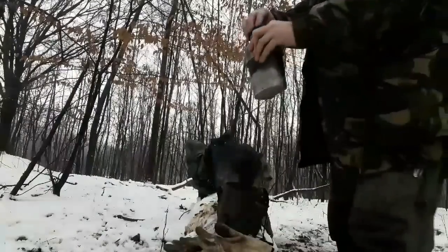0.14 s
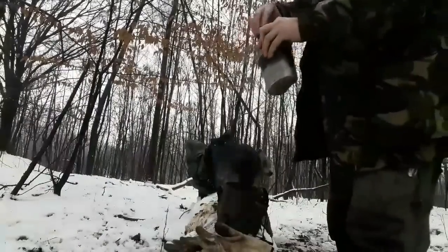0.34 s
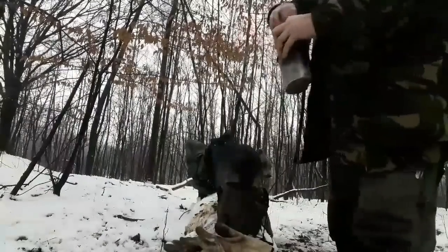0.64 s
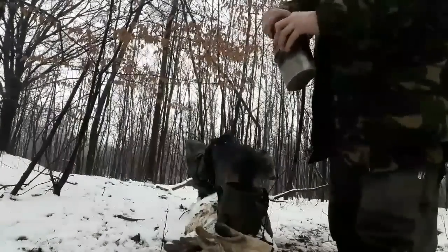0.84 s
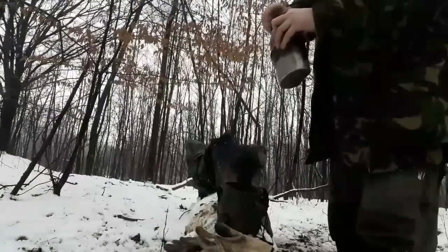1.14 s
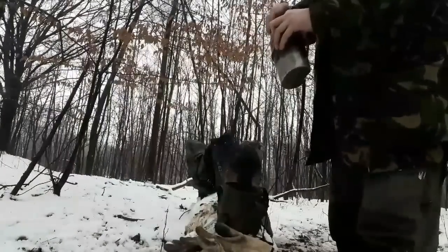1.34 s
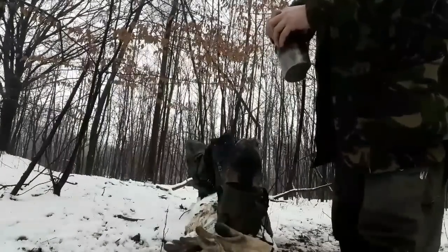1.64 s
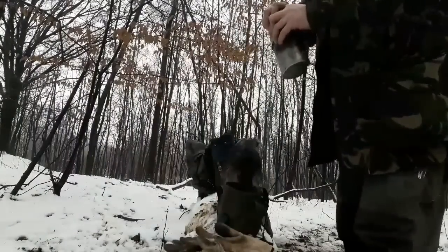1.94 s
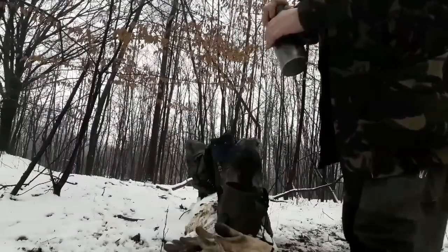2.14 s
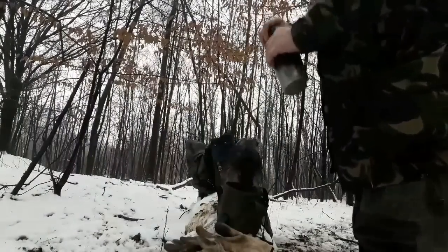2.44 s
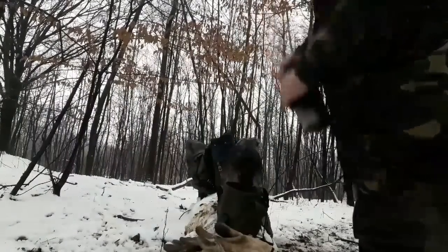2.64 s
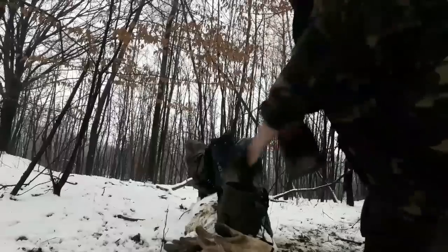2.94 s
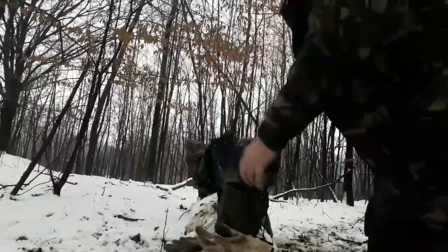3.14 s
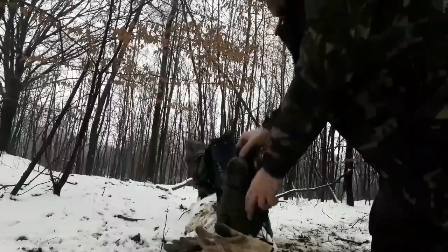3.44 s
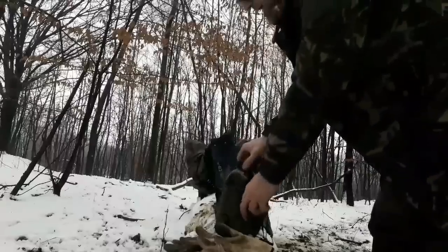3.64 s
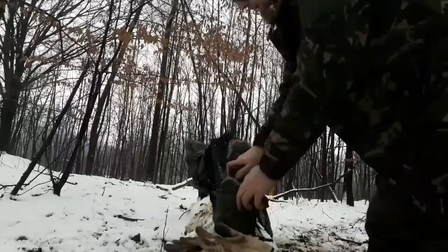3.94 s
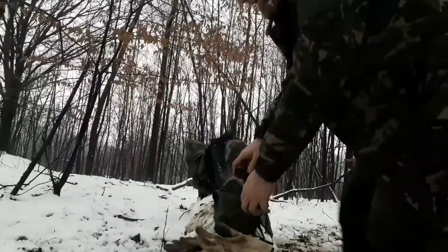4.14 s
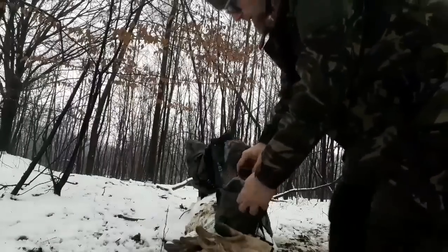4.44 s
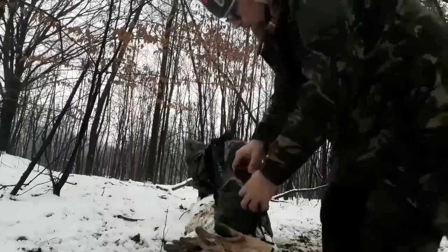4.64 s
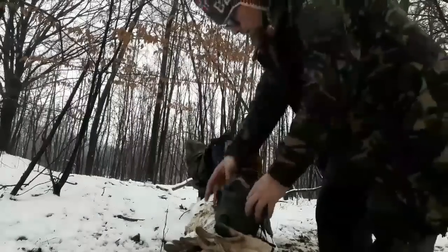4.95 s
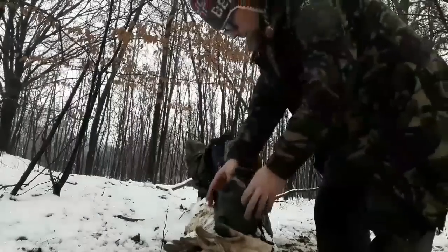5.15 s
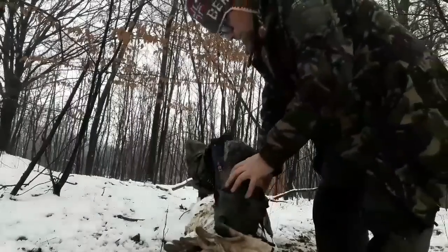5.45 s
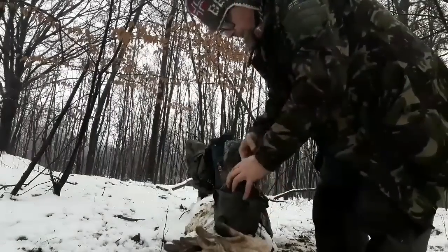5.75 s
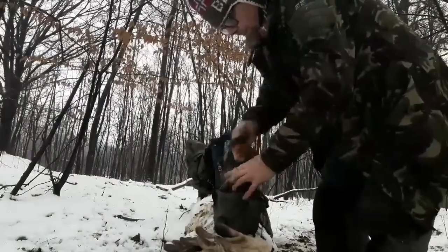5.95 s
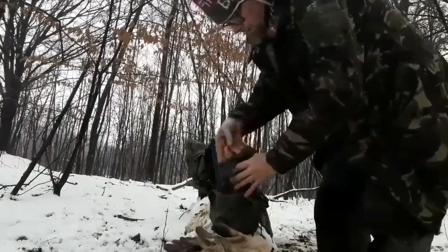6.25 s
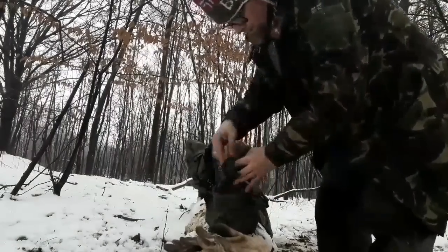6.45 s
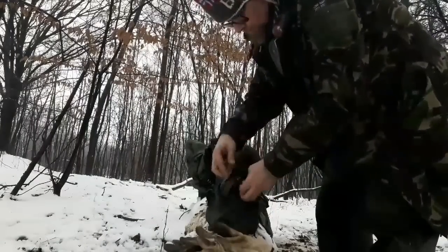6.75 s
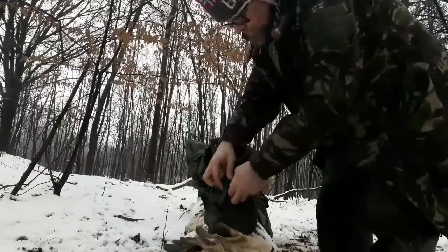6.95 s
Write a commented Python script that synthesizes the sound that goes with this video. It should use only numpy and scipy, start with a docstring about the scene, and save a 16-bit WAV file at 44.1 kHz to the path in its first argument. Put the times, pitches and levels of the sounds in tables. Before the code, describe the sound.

Outdoor handling heard near the microphone: hand-damped metal taps with one strong knock, short steel scrapes, then sparse light clinks. A cluster of loud, low hollow thuds follows as a bottle slips into a fabric pouch with a jerky rasp. Small cloth rustles and ticks lead to a soft pat and a sharp double plastic snap, with quiet rustling afterwards over faint hum and hiss.

```python
"""A quiet winter wood, where someone packs up: a steel mug is worked onto the foot of a bottle.
Dull knocks, light clinks and gritty scrapes; the bottle drops and slides into a stiff pouch, hands pat
the pack, a plastic buckle snaps shut. Blows are contact noise plus decaying modes; cloth, scrapes and
slides are trains of stick-slip grains, filtered and swelling with the movement.
The trees add a faint noise tail; behind lie rumble, drone, hum and microphone hiss."""
import sys
import numpy as np
from scipy import signal
from scipy.fft import rfft, irfft, next_fast_len
from scipy.io import wavfile

SR = 44100
rng = np.random.default_rng(int(sys.argv[2]) if len(sys.argv) > 2 else 0)


def master_out(mix):
    """Clip the mix to full scale and print it as 16-bit PCM to the path in sys.argv[1]."""
    frames = np.transpose(np.atleast_2d(mix))
    ceiling = np.clip(frames, -1, 1)
    pcm = np.round(ceiling * 32767).astype(np.int16)
    wavfile.write(sys.argv[1], SR, pcm)


N = 312655
RING = SR // 2  # samples computed per blow or echo
TIME, AGE = np.arange(N) / SR, np.arange(RING) / SR  # s

# dull spectrum of rubbed and patted material: freq_hz, density_db (relative, per Hz)
RUB_SPECTRUM = [(90, -4), (250, -5.5), (800, 6), (1400, -5), (2400, -35), (6000, -27)]


def undb(db):
    """Decibels to gain."""
    return 10 ** (np.asarray(db) / 20)


def unit(x):
    """Scale to rms 1."""
    return x / np.sqrt(np.mean(x ** 2))


def curves(table):
    """Each dB column of a curve table as a gain per sample, silent outside the table's span."""
    s, *columns = np.transpose(table)
    return [undb(np.interp(TIME, s, c, left=-np.inf, right=-np.inf)) for c in columns]


def colour(x, spectrum):
    """Give x a spectrum of (Hz, dB) points, interpolated over log frequency; rms 1."""
    hz, db = np.transpose(spectrum)
    size = next_fast_len(len(x))
    f = np.maximum(np.fft.rfftfreq(size, 1 / SR), 1)
    gain = undb(np.interp(np.log(f), np.log(hz), db))
    return unit(irfft(rfft(x, size) * gain, size)[:len(x)])


def resonate(x, hz, width_hz):
    """One resonance, gain 1 at its centre."""
    return signal.lfilter(*signal.iirpeak(hz, hz / width_hz, fs=SR), x)


def fade(t60_s):
    """Exponential decay from the moment of a blow, 60 dB in t60_s."""
    return np.exp(-np.log(1000) * AGE / t60_s)


def walk(rate_hz):
    """Random wander with a spread near 1: straight lines between rate_hz random points per second."""
    return np.interp(TIME * rate_hz, np.arange(4096), rng.standard_normal(4096))


def grains(rate_hz, spread_db):
    """Stick-slip clicks of uneven size and random sign, rate_hz per second on average; rms 1."""
    sizes = undb(spread_db * np.minimum(rng.exponential(size=N), 5))
    struck = rng.random(N) < rate_hz / SR
    return unit(struck * sizes * rng.choice([-1, 1], N))


def add(out, start_s, x):
    """Mix x into out from start_s."""
    i = int(start_s * SR)
    out[i:i + len(x)] += x[:N - i]


def blows(table, modes, contact, contact_t60_s, tail_db, tail_t60_s, rise_s, detune, focus_db, top_db,
          spot_db=0, count=1):
    """Each blow is contact noise with a weak tail plus the object's modes, balanced band by band."""
    # bass, middle, treble and very top of a blow: from_hz, to_hz
    bands_hz = [(120, 600), (600, 2200), (2200, 5500), (5500, 16000)]
    out = np.zeros(N)
    filters = [signal.butter(3, band, "bandpass", fs=SR, output="sos") for band in bands_hz]
    modes = np.repeat(modes, count, axis=0)  # each mode splits into count close partials
    hz = modes[:, :1]
    decays = np.array([(-1) ** k * undb(db) * fade(t60_s) for k, (_, db, t60_s) in enumerate(modes)])
    head = SR // 100  # levels are set on the first 10 ms
    for start_s, level_db, bass_db, treble_db, ring_db, spot_hz in table:
        # the grip shifts the modes a little; those an octave from the spot's pitch are focus_db weaker
        shifted_hz = hz * (1 + detune * rng.standard_normal(hz.shape))
        focus = undb(-focus_db * abs(np.log2(hz[:, 0] / spot_hz)))
        ring = focus @ (decays * np.sin(2 * np.pi * shifted_hz * AGE))
        noise_decay = fade(contact_t60_s) + undb(tail_db) * fade(tail_t60_s)
        burst = colour(rng.standard_normal(RING), contact) * noise_decay
        hit = undb(ring_db) * ring / ring[:head].std() + burst / burst[:head].std()
        hit = hit * (1 - np.exp(-AGE / rise_s))
        # each row sets its own bass and treble over the middle; the material sets the very top
        balance_db = (bass_db, 0, treble_db, treble_db + top_db)
        for sos, (lo_hz, hi_hz), db in zip(filters, bands_hz, balance_db):
            part = signal.sosfilt(sos, hit)
            favour_db = spot_db * (lo_hz <= spot_hz < hi_hz)  # the spot's own band
            add(out, start_s, part * undb(level_db + db + favour_db) / part[:head].std())
    return out


def alike(table, bass_db, treble_db, ring_db):
    """Light blows that share one balance and differ only in time, level and pitch."""
    return [(s, db, bass_db, treble_db, ring_db, spot_hz) for s, db, spot_hz in table]


def crinkle(spectrum, rate_hz, spread_db, surge_db, flicker_db):
    """Friction: grains come in surges, and wandering resonances favour now one pitch, now another."""
    slips = grains(rate_hz, spread_db) * undb(surge_db * walk(rate_hz=120))
    folds = 0
    for k, hz in enumerate(np.geomspace(400, 15000, 17)):
        flicker = undb(flicker_db * walk(rate_hz=38))
        folds = folds + (-1) ** k * resonate(slips, hz, hz / 6) * flicker
    return colour(folds, spectrum)


def strokes(table):
    """Gains of surface hiss and body rub: each stroke swells and dies away with the speed of the hand."""
    rise = 0.55  # share of the length spent speeding up
    edge_db, curve = 11.5, 1.16  # drop at either end, roundness of the peak
    surface, body = 0, 0
    for peak_s, length_s, surface_db, body_db in table:
        away = np.maximum((peak_s - TIME) / rise, (TIME - peak_s) / (1 - rise)) / length_s
        speed = undb(-edge_db * np.minimum(away, 10) ** curve)
        surface = np.hypot(surface, undb(surface_db) * speed)
        body = np.hypot(body, undb(body_db) * speed)
    return surface, body


def background():
    """Distant rumble, a low drone and a hum that waver in pitch and level, and steady microphone hiss."""
    # rumble: freq_hz, density_db (relative, per Hz)
    wood_spectrum = [(20, -34), (48, -5), (64, -6), (100, -4), (150, -7.5), (230, -19), (420, -13.5),
                     (700, -18), (1100, -13.5), (1600, -21), (2600, -29.5), (8000, -64)]
    # microphone hiss: freq_hz, density_db (relative, per Hz)
    hiss_spectrum = [(500, -3), (3000, -3), (5600, -3), (6400, 1), (7000, 7), (7700, 7), (8400, -2),
                     (12000, -2), (15500, -3), (18000, -20)]
    # faint far-off hum: time_s, level_db (before the trim and wander below)
    hum_levels = [(0, -85.5), (.8, -78), (3, -82), (4.6, -83), (5.4, -73.5), (6.3, -73.5), (7.09, -78)]
    air = colour(rng.standard_normal(N), wood_spectrum) * undb(-71.0 + 0.77 * walk(rate_hz=2.8))
    hiss = colour(rng.standard_normal(N), hiss_spectrum) * undb(-82.5)
    drone_gain = undb(-72.5 + 2.5 * walk(rate_hz=12))
    drone_hz = 77 + 3 * walk(rate_hz=13)
    drone = drone_gain * np.sin(2 * np.pi * np.cumsum(drone_hz) / SR)
    hum_gain = curves(hum_levels)[0] * undb(-0.5 + 1.7 * walk(rate_hz=3.6))
    hum_hz = 348 + 0.96 * walk(rate_hz=7.0)
    hum = hum_gain * np.sin(2 * np.pi * np.cumsum(hum_hz) / SR)
    return air + hiss + np.sqrt(2) * (drone + hum)  # sqrt 2: sine levels are rms


def trees(x, wet_db, t60_s, build_up_s):
    """Trunks scatter a faint, dull tail back: convolution with decaying coloured noise."""
    echo = colour(rng.standard_normal(RING), [(100, -34.5), (1200, 8.0), (4000, 2), (16000, -18)])
    echo = echo * fade(t60_s) * (1 - np.exp(-AGE / build_up_s))
    return undb(wet_db) * signal.fftconvolve(x, echo / np.linalg.norm(echo))[:N]


def pack():
    """Soft pats on the padding; cloth swishes in fine uneven grains over a duller rub."""
    # hands on the padded pack: start_s, level_db, pitch_hz
    pat_events = [(5.278, -67.5, 308), (5.3028, -68.5, 600), (5.53, -64.5, 500), (5.678, -63.5, 604),
                  (5.8521, -63.5, 390), (5.948, -50, 587)]
    # modes of the pack: freq_hz, level_db (relative), t60_s
    pack_modes = [(149, 7, 0.034), (341, 4, .03), (524, 0.5, 0.017), (712, 9, 0.037)]
    # sleeves, straps and fingers over cloth: peak_s, length_s, swish_db, rub_db
    cloth_strokes = [(2.93, 0.47, -72, -71.5), (3.363, 0.22, -76, -67.5), (3.78, 0.088, -64, -69),
                     (3.944, 0.18, -78, -74), (4.138, 0.39, -69, -85), (4.409, 0.26, -62, -69),
                     (4.573, 0.09, -58.5, -73), (4.8, 0.45, -78.5, -99), (5.174, 0.2, -72.5, -78),
                     (5.316, 0.11, -62, -64.5), (5.579, .12, -69, -66), (5.78, 0.2, -75, -82),
                     (5.992, 0.047, -61.5, -87), (6.097, 0.12, -64.5, -86), (6.253, 0.057, -65, -59),
                     (6.373, 0.21, -70, -69), (6.614, 0.046, -60, -86), (6.744, 0.54, -68.5, -89),
                     (7.07, 0.088, -68, -82)]
    # cloth surface: freq_hz, density_db (relative, per Hz)
    swish_spectrum = [(1000, -7), (2200, -7.5), (4200, -4.5), (5800, -5.5), (7300, 6.5), (8500, -13.5),
                      (12000, -4), (15500, -15), (18000, -21)]
    pats = blows(alike(pat_events, bass_db=2.0, treble_db=-12, ring_db=7.5), pack_modes, RUB_SPECTRUM,
                 contact_t60_s=0.028, tail_db=-8.5, tail_t60_s=0.22, rise_s=0.0014,
                 detune=0.076, focus_db=5.0, top_db=-2.0)
    swish, rub = strokes(cloth_strokes)
    # the jacket never lies quite still
    swish, rub = np.hypot(swish, undb(-86.5)), np.hypot(rub, undb(-80.5))
    threads = crinkle(swish_spectrum, rate_hz=3500, spread_db=3.6, surge_db=1.8, flicker_db=2.5)
    padding = grains(rate_hz=1600, spread_db=-2.5) * undb(3.1 * walk(rate_hz=38))
    return pats + swish * threads + rub * colour(padding, RUB_SPECTRUM)


def buckle():
    """Hard plastic: two prongs spring home one after the other; small bright ticks share its modes."""
    # the two prongs: start_s, level_db, bass_db, treble_db (both over level), ring_db (over noise), pitch_hz
    snap_events = [(6.2836, -47.5, -8.5, 16, 0.5, 6400), (6.331, -52, -14, 13.5, -11, 2150)]
    # small bright ticks, some from straps and fittings, one (1.418 s) from the mug scraping:
    # start_s, level_db, pitch_hz
    tick_events = [(.642, -78.5, 5040), (1.274, -87, 7400), (1.418, -78, 7100), (3.767, -75.5, 4500),
                   (4.0662, -72.5, 7400), (4.3101, -75, 7400), (4.543, -74, 7400), (5.078, -79.5, 7100),
                   (6.0541, -75, 6500), (6.073, -72, 4370), (6.224, -76, 2500), (6.2372, -67, 2500),
                   (6.5684, -70, 2500), (6.7061, -77, 7400), (6.8084, -77.5, 6500), (7.0098, -73.5, 7400)]
    # modes of the plastic: freq_hz, level_db (relative), t60_s
    buckle_modes = [(1934, -11, 0.037), (2615, -10.5, 0.018), (3600, -18.5, 0.045), (4320, -5.5, 0.016),
                    (4770, -24.5, 0.032), (6524, 3, 0.015), (7800, -7.5, 0.0098), (8780, -9.5, 0.025),
                    (10200, 3, 0.0096), (14100, -23, 0.027)]
    # contact noise: freq_hz, density_db (relative, per Hz)
    plastic_contact = [(150, -44), (1200, -10), (2100, -0.5), (3300, -10), (5500, -5.5), (7300, 1.5),
                       (9000, -9), (16000, -9.5)]
    snaps = blows(snap_events, buckle_modes, plastic_contact,
                  contact_t60_s=0.014, tail_db=-26, tail_t60_s=0.12, rise_s=.0001,
                  detune=0.0098, focus_db=10, top_db=1.0)
    ticks = blows(alike(tick_events, bass_db=-18.5, treble_db=6, ring_db=-1.5), buckle_modes, plastic_contact,
                  contact_t60_s=.018, tail_db=-15, tail_t60_s=.08, rise_s=.0002,
                  detune=.04, focus_db=8, top_db=1.0, spot_db=6.5)
    return snaps + ticks


def shoves():
    """Gains of rasp and bottle resonance: each shove builds up, sags while it lasts and stops."""
    # start_s, attack_s, hold_s, release_s, rasp_db (fabric), body_db (bottle resonance)
    shove_events = [(3.403, 0.018, 0.041, 0.15, -56, -39.5), (3.472, 0.059, 0.19, 0.032, -49, -42.5),
                    (3.782, 0.072, 0.0035, 0.05, -42, -49)]
    range_db = 27.5  # rise over the attack, fall over the release
    # the pouch grips the bottle and damps its body sooner than the rasp
    rasp_sag_db_per_s, body_sag_db_per_s = 24, 68
    rasp, hollow = 0, 0
    for start_s, attack_s, hold_s, release_s, rasp_db, body_db in shove_events:
        age_s = TIME - start_s - attack_s
        before, after = np.maximum(-age_s / attack_s, 0), np.maximum((age_s - hold_s) / release_s, 0)
        gate_db = -range_db * (before + after)
        held_s = np.maximum(age_s, 0)
        rasp = rasp + undb(rasp_db + gate_db - rasp_sag_db_per_s * held_s)
        hollow = hollow + undb(body_db + gate_db - body_sag_db_per_s * held_s)
    return rasp, hollow


def bottle():
    """The bottle knocks into the pouch and slips down in jerks that rasp the weave and ring its hollow body."""
    # bumps, and the last jerk of the slide:
    # start_s, level_db, bass_db, treble_db (both over level), ring_db (over noise), pitch_hz
    thud_events = [(3.403, -29.5, 3.5, -14.5, -0.5, 600), (3.413, -35, -7, -27, -9, 795),
                   (3.462, -32, 0.5, -7.5, -7, 486), (3.504, -51.5, -11, 2, -9, 1800),
                   (3.5255, -42, -10, 1, -17, 1500), (3.576, -46, -11, -1, 3, 600),
                   (3.648, -55, -3, 6, -5, 2400), (3.675, -57, 2, 9.5, 3, 3000),
                   (3.847, -58.5, 9.5, 17, -11, 4340)]
    # modes of the struck bottle: freq_hz, level_db (relative), t60_s
    bottle_modes = [(447, -11.5, 0.11), (482.4, 0, 0.13), (445, -4.5, 0.017), (549, 5.5, 0.03),
                    (760, 2.5, 0.022), (1010, -10.5, 0.22), (1335, -5.5, 0.086), (1510, 6, 0.06),
                    (1610, -4, 0.25), (1910, -10, 0.11), (1900, -20, 0.085), (3430, -19, 0.098),
                    (5000, -30, .04)]
    # contact noise: freq_hz, density_db (relative, per Hz)
    pouch_contact = [(100, -65), (280, -10), (420, 0), (620, -1.5), (1100, -10), (1700, -3.5), (2600, -8),
                     (5500, -11), (7500, 2.5), (9000, -7.5), (16000, -9)]
    # resonances of the bottle rubbing along the pouch: freq_hz, width_hz, level_db (relative)
    rubbed_modes = [(459, 18, 4.5), (685, 190, -6), (1195, 58, -13.5), (1560, 1350, -12), (1770, 120, -17),
                    (2020, 120, -55)]
    # rasp of the weave: freq_hz, density_db (relative, per Hz)
    rasp_spectrum = [(300, -14), (1500, -3), (2600, 0), (4500, -1), (6000, -3), (7500, 0), (8800, -8),
                     (12000, -12), (15000, -15), (18000, -30)]
    thuds = blows(thud_events, bottle_modes, pouch_contact,
                  contact_t60_s=.034, tail_db=-23, tail_t60_s=.15, rise_s=.0006,
                  detune=.008, focus_db=6, top_db=-5)
    rasp, hollow = shoves()
    slips = grains(rate_hz=3000, spread_db=1.0) * undb(2.5 * walk(rate_hz=93))
    body = unit(sum(undb(db) * resonate(slips, hz, width_hz) for hz, width_hz, db in rubbed_modes))
    weave = crinkle(rasp_spectrum, rate_hz=1400, spread_db=3.5, surge_db=3, flicker_db=4.5)
    return thuds + rasp * weave + hollow * body


def scraping():
    """Steel slides on steel with a gritty hiss and a dull rub as the mug is worked on."""
    # the mug's wall along the bottle: peak_s, length_s, hiss_db, rub_db
    scrape_strokes = [(.23, 0.091, -72, -72), (.825, 0.18, -60, -70), (1.195, 0.078, -61, -55.5)]
    # steel hiss: freq_hz, density_db (relative, per Hz)
    scrape_spectrum = [(880, -31), (1500, -0.5), (2740, -22), (3840, -5.5), (4590, -11.5), (5280, -3.5),
                       (6060, -10.5), (7320, -0.5), (8240, -10.5), (16000, -12)]
    hiss, rub = strokes(scrape_strokes)
    grit = crinkle(scrape_spectrum, rate_hz=5000, spread_db=2.5, surge_db=1.6, flicker_db=2.5)
    return hiss * grit + rub * colour(grains(rate_hz=1800, spread_db=3.5), RUB_SPECTRUM)


def mug():
    """Hand-damped knocks of the steel wall; the rim's lighter clinks ring in rough clusters of close partials."""
    # mug on bottle: start_s, level_db, bass_db, treble_db (both over level), ring_db (over noise), pitch_hz
    knock_events = [(.093, -53.5, 2.5, -13, 0, 900), (.1067, -50.5, 6.5, -2.5, 28, 280),
                    (.1367, -45, 0.5, 1.5, -5, 4460), (.165, -54, -1, -19, -6, 1200),
                    (.2529, -57.5, -4, -15, -10.5, 1000), (.5405, -34, -14.5, -11.5, -0.5, 1060),
                    (.5478, -47, -26, -3, 16, 1080), (.8421, -54.5, -4.5, -10.5, -2.5, 500),
                    (.9488, -66, -1, -26, -2, 500), (1.156, -46, -2, -12.5, -12, 900),
                    (1.1785, -51.5, -4, -5, -16, 395), (1.2055, -49, -1.5, -6.5, -17, 348),
                    (1.2142, -44.5, -17, -12, -7.5, 1200), (1.384, -63, 6.5, -25, -12, 300),
                    (6.4045, -59, -3.5, -9.5, -24, 1500)]
    # rim and handle on metal: start_s, level_db, bass_db, treble_db, ring_db, pitch_hz
    clink_events = [(1.4305, -57, -2.5, -1, -9, 2000), (1.661, -56, -9, 0, 0, 1950),
                    (1.677, -70, -9, 3, 4, 1900), (2.087, -82.5, -10, 6, 15, 5200),
                    (2.123, -62, -30, -11, -10, 900), (2.319, -82, -10, 23.5, 12, 3200),
                    (3.166, -52, -28, -4.5, 9.5, 2450)]
    # modes of the wall: freq_hz, level_db (relative), t60_s
    wall_modes = [(259.5, 0.5, 0.22), (359, -16, 0.21), (441.3, -6, 0.2), (507, -21.5, 0.36),
                  (700, -12, 0.16), (957, 12.5, 0.02), (1018, 7, 0.05), (1156.5, 7.5, 0.2),
                  (1330, -4, 0.19), (1353, -11, 0.48), (1610, 5, 0.11), (1617, -6, 0.13), (1836, -14, 0.24),
                  (2830, -27, 0.11), (3560, 4.5, 0.028), (3770, -9.5, 0.13), (4880, -18, 0.098),
                  (4970, -18.5, 0.099), (6830, -17, 0.057)]
    # modes of the rim: freq_hz, level_db (relative), t60_s
    rim_modes = [(274, -20, 0.22), (980, -19, 0.23), (1293, 9, 0.38), (1533, -15, 0.33), (1680, 5, 0.1),
                 (2147, -1, 0.21), (2687, -0.5, 0.36), (3170, 13, 0.15), (3340, 6, 0.21), (4130, -1, 0.12),
                 (5010, -13.5, 0.17), (6600, -10, 0.21), (7250, -16, 0.089)]
    # contact noise: freq_hz, density_db (relative, per Hz)
    steel_contact = [(100, -41), (280, -1.5), (700, -8.5), (1100, 17.5), (1600, 5), (2500, -12.5),
                     (3400, 0), (6000, -23.5), (7600, -17.5), (8600, -31), (16000, -29.5)]
    knocks = blows(knock_events, wall_modes, steel_contact,
                   contact_t60_s=.03, tail_db=-11.5, tail_t60_s=0.21, rise_s=.0008,
                   detune=0.0037, focus_db=5, top_db=0.2)
    clinks = blows(clink_events, rim_modes, steel_contact,
                   contact_t60_s=.045, tail_db=-14, tail_t60_s=.22, rise_s=.0005,
                   detune=.06, focus_db=12, top_db=-0.5, count=14)
    return knocks + clinks


def scene():
    """All the handling, its tail among the trees and the background."""
    near = mug() + scraping() + bottle() + buckle() + pack()
    tail = trees(near, wet_db=-29.0, t60_s=0.34, build_up_s=0.0086)
    return (near + tail + background())[None]


def record(dry):
    """The recorder cuts the top steeply above 16.2 kHz with an elliptic low-pass."""
    return signal.sosfilt(signal.ellip(10, .2, 70, 16200, fs=SR, output="sos"), dry)


dry = scene()
out = record(dry)
master_out(out)
```